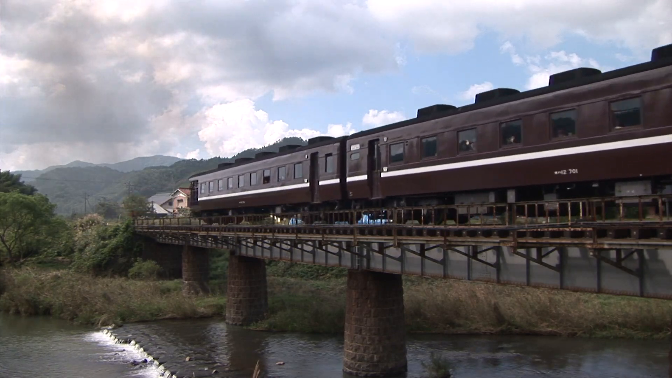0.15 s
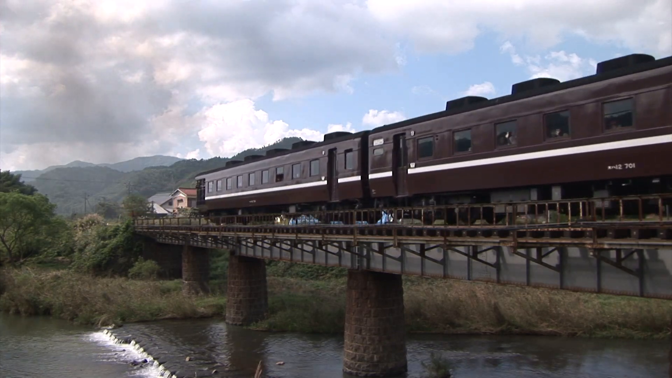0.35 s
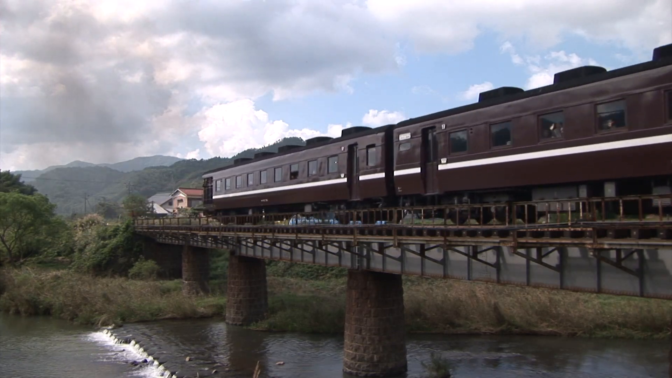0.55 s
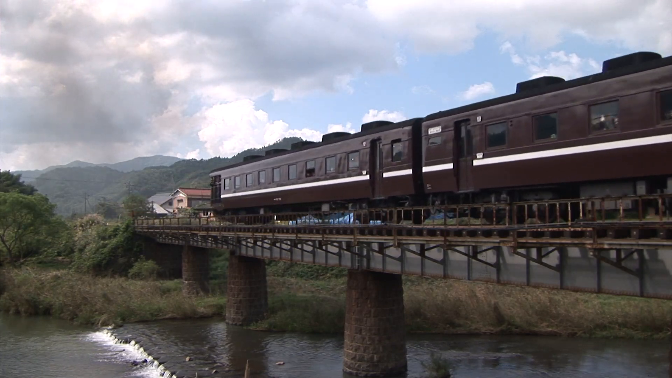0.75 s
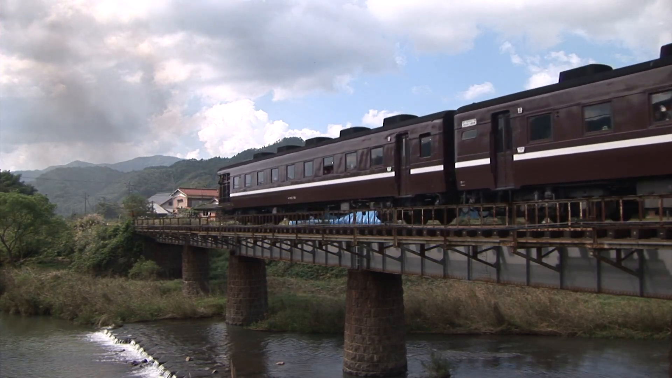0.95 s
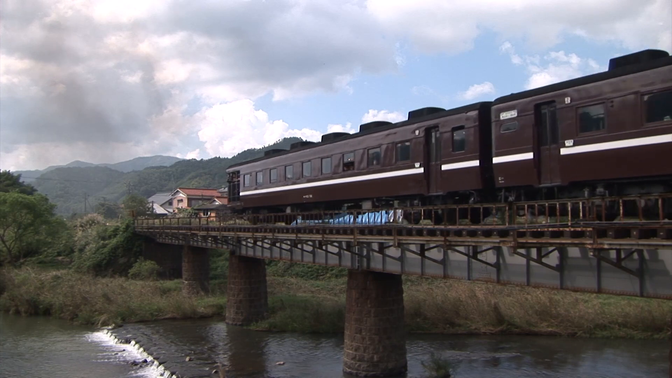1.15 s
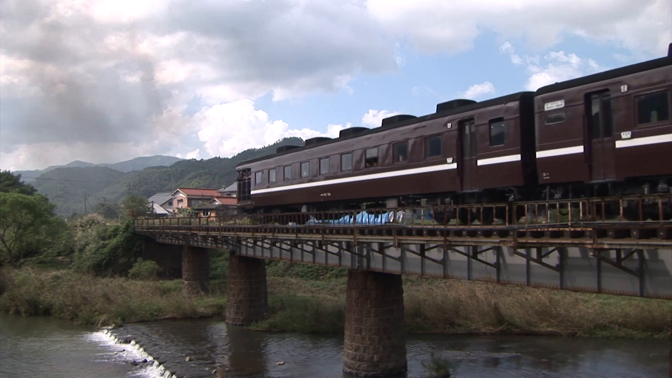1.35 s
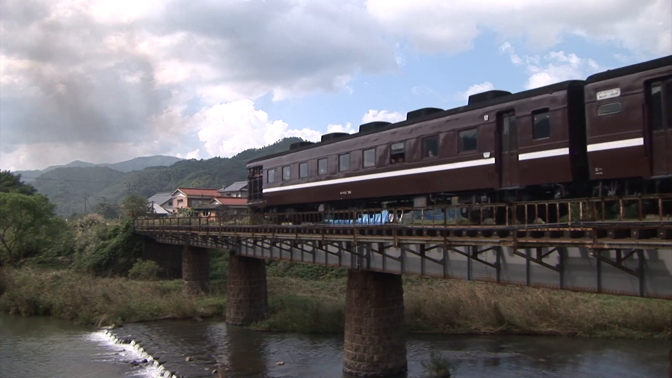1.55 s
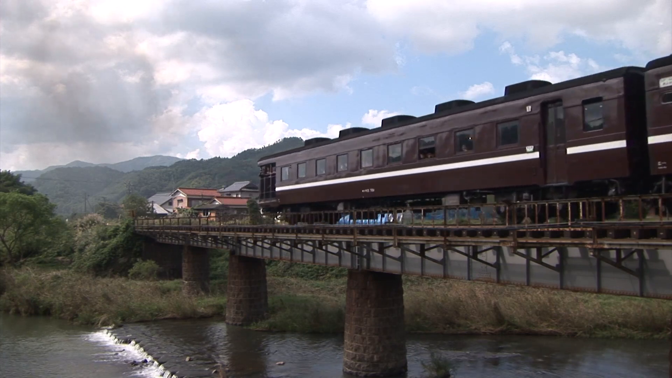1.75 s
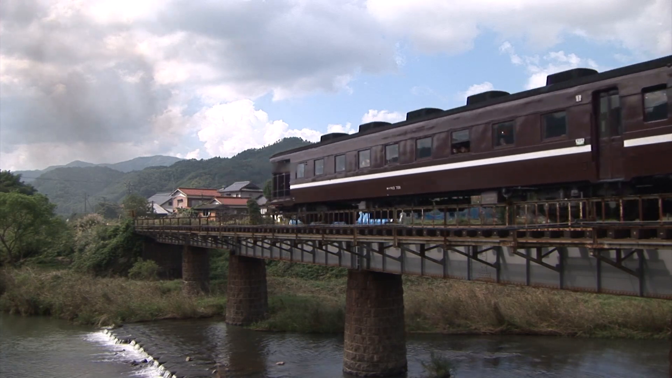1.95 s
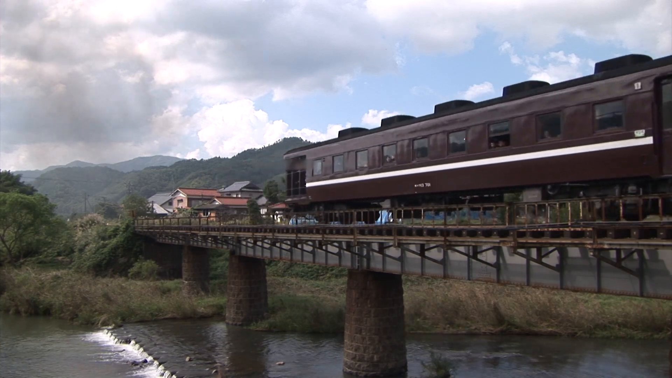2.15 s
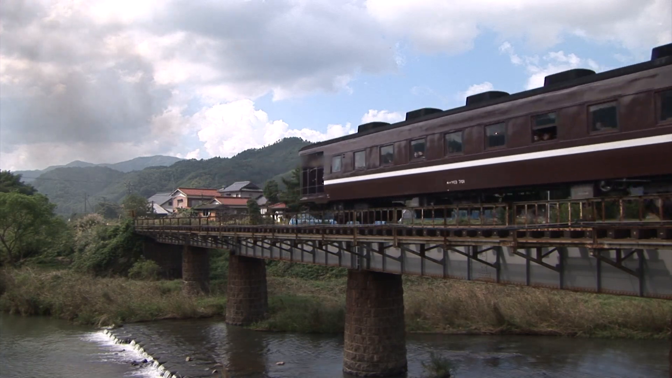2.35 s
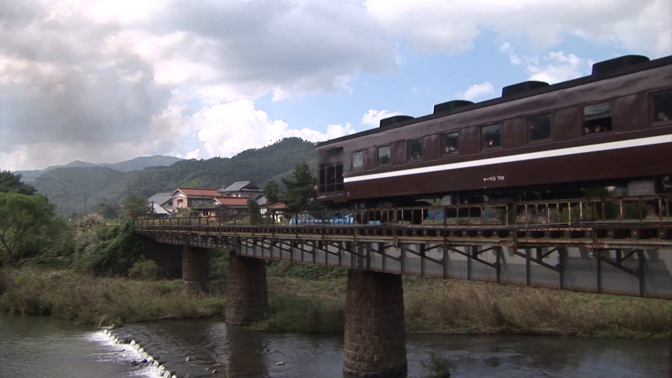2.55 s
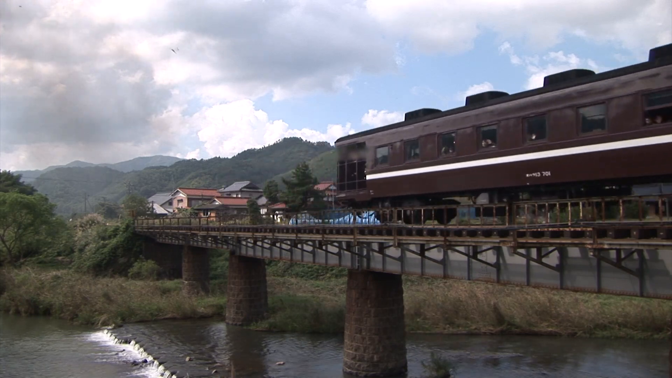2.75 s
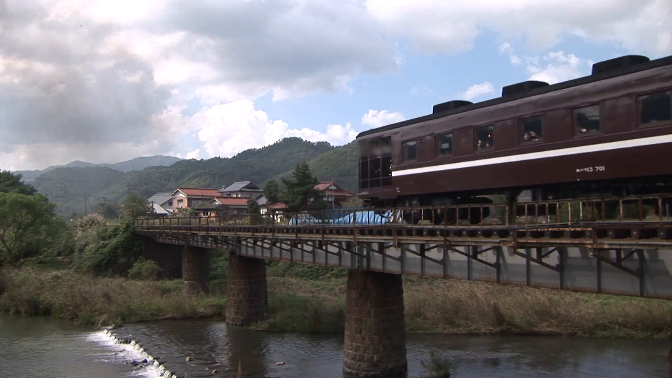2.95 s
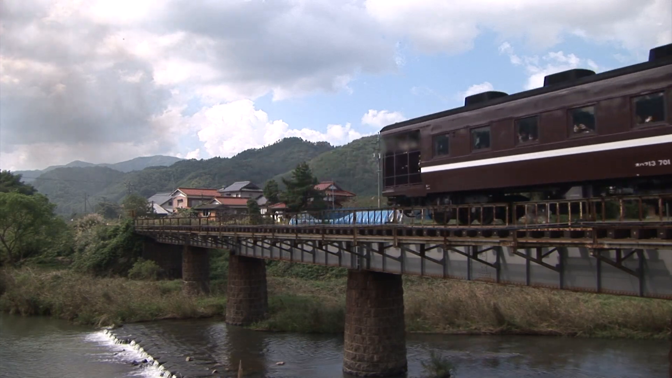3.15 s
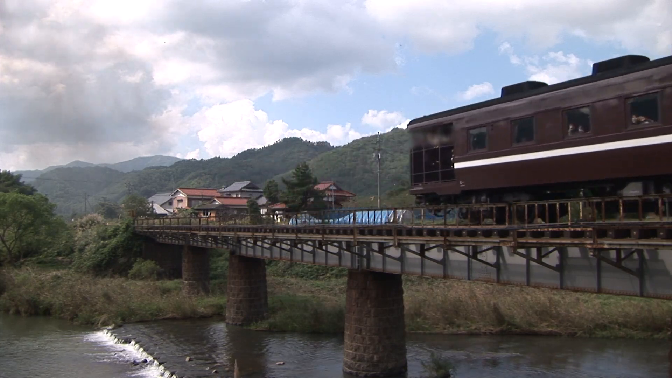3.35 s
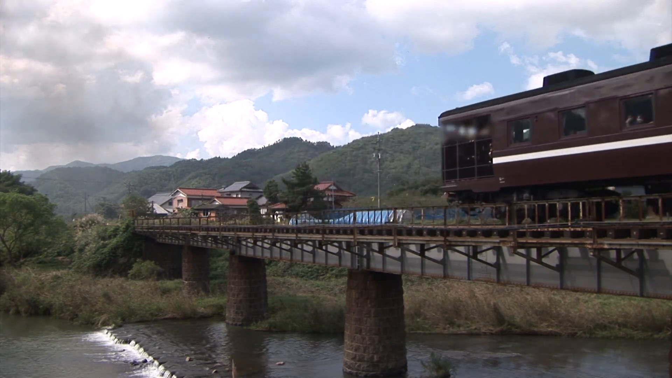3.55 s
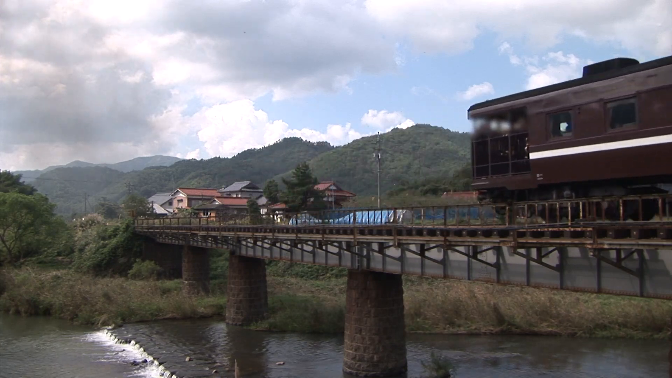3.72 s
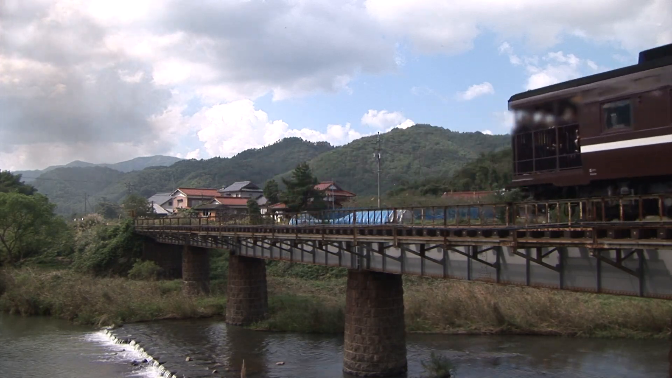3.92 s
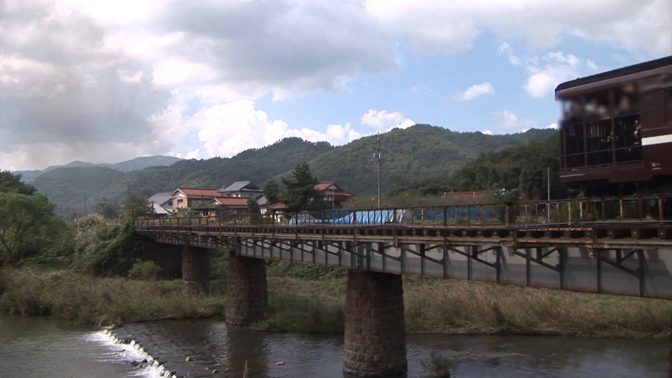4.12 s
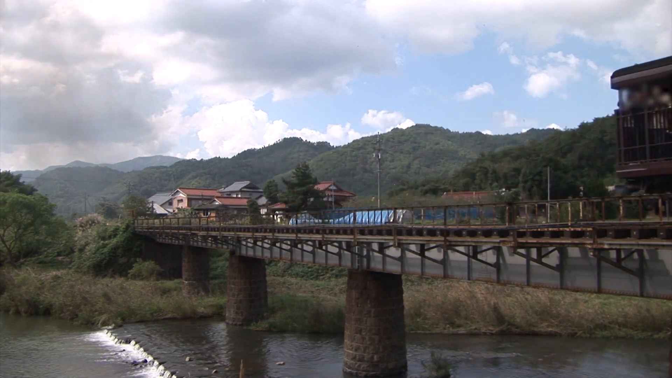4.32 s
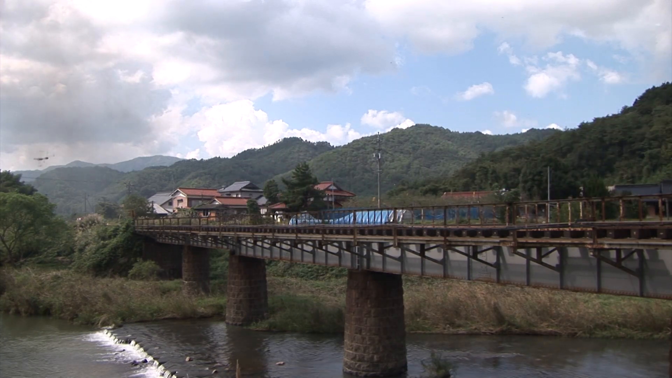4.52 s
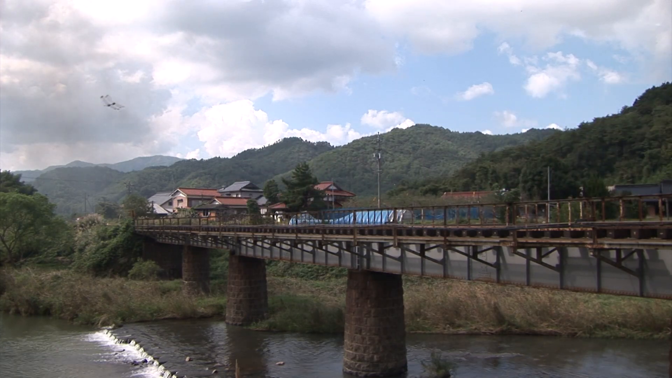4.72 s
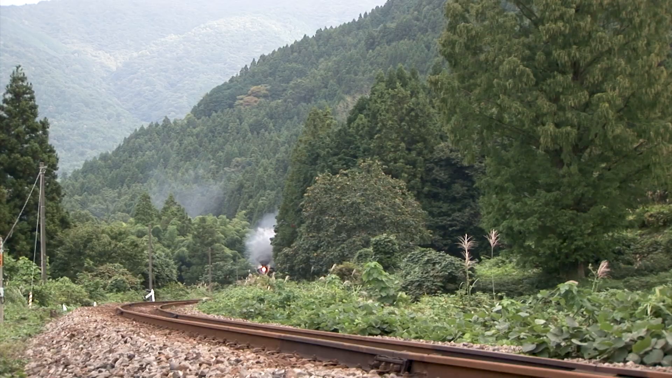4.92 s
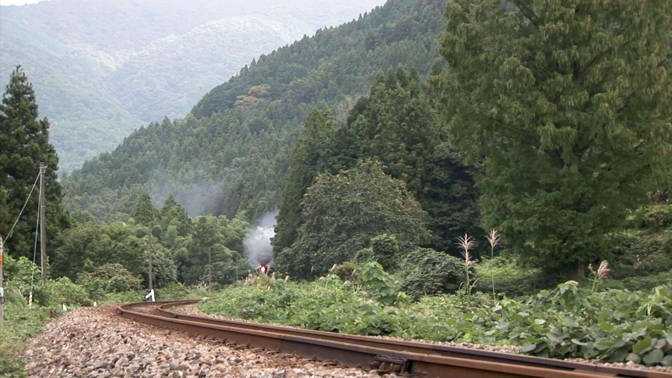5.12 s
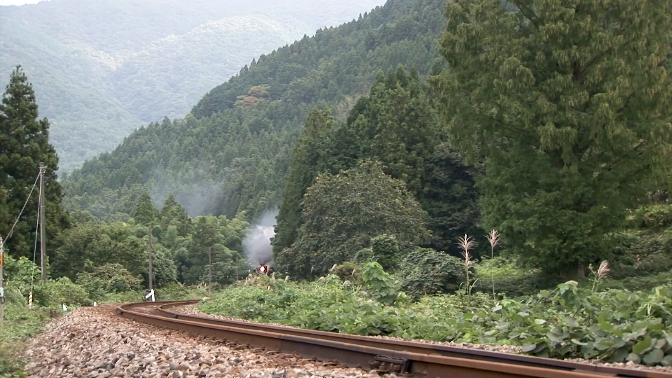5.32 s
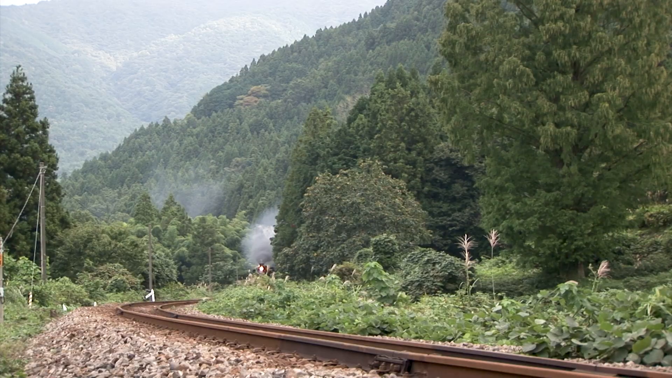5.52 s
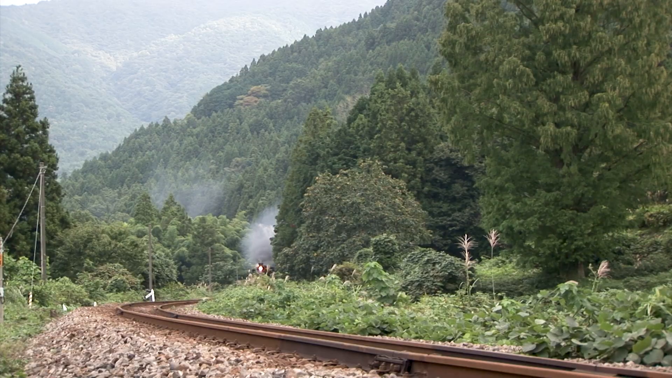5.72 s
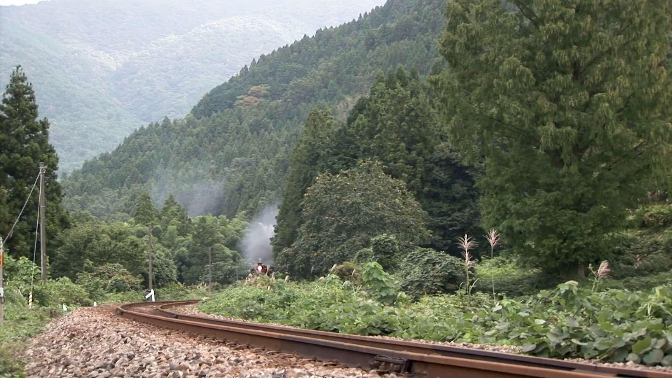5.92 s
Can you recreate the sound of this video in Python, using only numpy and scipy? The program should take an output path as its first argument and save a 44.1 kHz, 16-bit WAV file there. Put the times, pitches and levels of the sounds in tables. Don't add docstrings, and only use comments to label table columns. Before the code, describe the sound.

Passenger coaches clatter over rail joints on a steel girder bridge, booming and rumbling with faint squeals, then a near-silent valley with crickets.

```python
import sys
import numpy as np
from scipy import signal
from scipy.io import wavfile

SR = 44100
rng = np.random.default_rng(int(sys.argv[2]) if len(sys.argv) > 2 else 0)


def dump(signal):
    limited = np.clip(np.atleast_2d(signal).T, -1, 1)
    pcm = np.round(limited * 32767).astype(np.int16)
    wavfile.write(sys.argv[1], SR, pcm)


def ratio(d):
    e = np.asarray(d, float) / 20
    return 10 ** e


N = 263277
T = np.arange(N) / SR

# (time [s], rumble level [dB])
ROLLING_LEVEL = [
    (0, -27),
    (.6, -32.5),
    (1.3, -32.5),
    (1.8, -30.5),
    (2.6, -32.5),
    (3.6, -33.5),
    (4.2, -33.5),
    (4.9, -36.5),
]
# (frequency [Hz], left-right likeness [0..1])
BRIDGE_LIKENESS = [(60, 0.95), (120, 1), (240, 0.92), (470, 0.83), (930, 0.9), (1840, 0.93), (3640, 0.75),
                   (7210, 0.91), (14300, 1)]
# (frequency [Hz], left minus right [dB])
BRIDGE_TILT = [(60, -1), (120, 0), (240, 0.0), (470, -2.5), (930, -4), (1840, -4.5), (3640, -3),
               (7210, -0.5), (14300, 5)]
# (time [s], blow [dB], brightness [dB], rebound [dB rel], rebound delay factor [1])
NEAR_AXLES = [
    (.1805, -7.5, -4, -3, 0.73),
    (.440, -5.5, -2, -11, 1.2),
    (2.0123, -8, -1, 3, 0.64),
    (2.266, -6, -0.5, 0.5, 0.94),
    (2.8995, -8, -4.5, -1, 0.96),
    (3.15, -5.5, -4, 1, 1.15),
    (4.682, -7.5, -3.5, -13, 0.99),
]
FAR_AXLES = [
    (-.008, -10.5, 1.5, 1.5, .6),
    (1.559, -10.5, 0.5, 6, 0.94),
    (1.8155, -10.5, 0.5, 2, 1.1),
]
CRACK_DB, CRACK_TOP_DB, CRACK_PAN_DB = -15, -23, -10.5


def rms_one(x):
    return x / np.sqrt(np.mean(x ** 2) + 1e-20)


def columns_at(rows, where, scale=lambda v: v):
    key, *columns = np.transpose(rows)
    return [np.interp(scale(where), scale(key), c) for c in columns]


def at_hz(rows, hz):
    return columns_at(rows, hz, np.log)


def drift(rate):
    r = np.exp(-80 * np.pi * rate / SR)
    slow = signal.lfilter([1], [1, -2 * r, r * r], rng.standard_normal(N // 40 + 2002))[2000:]
    return np.interp(np.arange(N) / 40, np.arange(len(slow)), rms_one(slow))


def resonance(x, hz, width_hz):
    r = np.exp(-np.pi * width_hz / SR)
    poles = [1, -2 * r * np.cos(2 * np.pi * hz / SR), r * r]
    return signal.lfilter(np.array([1, 0, -1]) * (1 - r * r) / 2, poles, x)


def narrow_noise(shape, hz, width_hz, widen=1):
    once = resonance(rng.standard_normal(shape), hz, width_hz)
    return rms_one(resonance(once, hz, widen * width_hz))


def band_pass(x, low, high):
    return signal.sosfilt(signal.butter(3, [low, high], "band", fs=SR, output="sos"), x)


def sides(pan_db):
    return ratio(np.multiply.outer([.5, -.5], pan_db))


def fade(seconds_in, length, power):
    return np.clip(seconds_in / length, 0, 1) ** power


def banded(spectrum, likeness, envelope, start=0):
    band_edges = 28 * 2 ** (np.arange(28) / 3)
    run_in = 4000
    out, power = np.zeros((2, N)), 0
    white = rng.standard_normal((2, 2, N - start + run_in))
    for k, (low, high) in enumerate(zip(band_edges, band_edges[1:])):
        mid, side = band_pass(white[k % 2], low, high)[:, run_in:]
        hz = np.sqrt(low * high)
        alike = np.clip(at_hz(likeness, hz)[0], 0, 1)
        gain = ratio(at_hz(spectrum, hz)[0])
        pair = np.sqrt(1 + alike) * mid + np.sqrt(1 - alike) * side * [[1], [-1]]
        out[:, start:] += gain * pair * envelope(hz)[..., start:]
        power += gain ** 2 * 4 * (high - low) / SR
    return out / np.sqrt(power)


def valley():
    # (frequency [Hz], density [dB per Hz])
    murmur = [(18, -42), (30, -11), (188, 2), (419, 0), (516, 0), (780, -8), (1310, -9), (2840, -22.5),
              (5720, -24.5), (6340, -25), (9100, -26), (12100, -25), (14500, -33.5)]
    # (frequency [Hz], left-right likeness [0..1])
    valley_likeness = [(60, 0.98), (240, 0.98), (930, 0.72), (3640, 0.61), (14300, 0.56)]
    # (frequency [Hz], width [Hz], level [dB])
    crickets = [(4080, 220, -86.5), (4420, 160, -88), (6330, 190, -82)]
    # (start [s], length [s], level [dB])
    katydid = [
        (5.167, 0.14, -75),
        (5.355, .335, -77),
        (5.71, .066, -81.5),
        (5.795, .06, -80),
        (5.9, .08, -74),
    ]
    swell_db, edge_s = 7, .012
    out = ratio(-61.5) * banded(murmur, valley_likeness, lambda hz: ratio(drift(5.7)), start=round(4.9 * SR))
    for hz, width_hz, level_db in crickets:
        out += ratio(level_db) * narrow_noise((2, N), hz, width_hz)
    bursts = np.zeros(N)
    for s, length, level_db in katydid:
        swell = ratio(level_db + swell_db * ((T - s) / length - 1).clip(-1, 0))
        bursts += swell * (np.minimum(T - s, s + length - T) / edge_s).clip(0, 1)
    pulses = 1 + 0.76 * np.sin(2 * np.pi * 42 * T + 1.5 * drift(4.5))
    return out + narrow_noise((2, N), 11600, 2200) * pulses * bursts


def rolling(patchy_db=1.43):
    # (frequency [Hz], density [dB per Hz])
    rumble = [(24, -51.5), (40, -19), (86, -9.5), (167, -2), (350, -3.5), (427, 2), (734, -7), (1090, -7.5),
              (1870, -17.5), (2170, -16), (2340, -23), (2520, -20.5), (4550, -34), (8860, -45),
              (14500, -60)]
    level_db, = columns_at(ROLLING_LEVEL, T)
    deep_db = -10 + 4.5 * drift(0.98)
    hiss_db = -0.5 + 0.1 * (level_db - level_db.mean())
    shared = drift(5.4)

    def envelope(hz):
        deep = np.clip(np.log2(200 / hz), 0, 1.5)
        bright = np.clip(np.log2(hz / 1200), 0, 2.5)
        patches_db = patchy_db * (0.42 * shared + drift(9))
        lean = sides(at_hz(BRIDGE_TILT, hz)[0] + 1.3)[:, None]
        return lean * ratio(level_db + deep * deep_db + bright * hiss_db + patches_db)
    return banded(rumble, BRIDGE_LIKENESS, envelope)


def wheels():
    # (frequency [Hz], width [Hz], level [dB])
    wheel_modes = [(2130, 71, 0.5), (2530, 84, -4.5), (2780, 42, -3.5), (3210, 63, -3.5), (3380, 87, -9.5),
                   (3900, 54, -8), (4280, 27, -11.5)]
    level_db, = columns_at(ROLLING_LEVEL, T)
    out = np.zeros(N)
    for hz, width_hz, mode_db in wheel_modes:
        out += ratio(mode_db + 2.5 * drift(6)) * narrow_noise(N, hz, width_hz)
    return out * ratio(level_db - 29.5) * sides(-7.5)[:, None]


def squeals():
    # (start [s], end [s], frequency [Hz], width [Hz], level [dB])
    whistles = [
        (0, .5, 8570, 300, -78),
        (.55, .95, 8900, 200, -77.5),
        (1.503, 1.59, 6500, 200, -66),
        (1.616, 2.297, 8800, 399, -69.5),
        (2.305, 2.587, 8800, 255, -64),
        (2.66, 2.82, 8950, 300, -70),
        (2.95, 3.751, 8950, 326, -72),
        (4.1, 4.62, 3440, 60, -60),
        (4.577, 4.696, 3480, 60, -52.5),
        (1.427, 1.454, 2130, 80, -46),
    ]
    out = np.zeros(N)
    for start, end, hz, width_hz, level_db in whistles:
        span = (T >= start) & (T < end)
        tone = narrow_noise(span.sum(), hz, width_hz)
        window = np.clip(np.minimum(T[span] - start, end - T[span]) / 0.02, 0, 1)
        out[span] += tone * window * ratio(level_db + 1.2 * drift(10)[span])
    return out


def cracks(axles, rel_db, top_db, pan_db, lead_s=0):
    return [(s - lead_s, blow_db + rel_db, top_db + bright_db, pan_db) for s, blow_db, bright_db, *_ in axles]


def ticks(snap_db=-7, snap_t60=0.11, tick_db=-9, tick_t60=.07):
    snap = rms_one(band_pass(rng.standard_normal(N), 500, 1620))
    tick = rms_one(band_pass(rng.standard_normal(N), 6500, 10000))
    tick = tick + .3 * np.multiply.outer([1, -1], np.roll(tick, SR))
    near = cracks(NEAR_AXLES, CRACK_DB, CRACK_TOP_DB, CRACK_PAN_DB)
    far = cracks(FAR_AXLES, -18, -15, -1, lead_s=.006)
    out = np.zeros((2, N))
    for s, crack_db, top_db, pan_db in near + far:
        age = np.maximum(T - s, 0)
        out += (T >= s) * snap * ratio(crack_db + snap_db - 60 * age / snap_t60) * sides(pan_db)[:, None]
        out += (T >= s) * tick * ratio(crack_db + top_db + tick_db - 60 * age / tick_t60)
    return out


def rail(ring_db=-10.5, contact_s=0.011):
    # (frequency [Hz], level [dB], t60 [s])
    rings = [(1450, -5, .08), (1600, -5, .08), (2110, -7, .1), (2170, -8, .12), (2475, -1, .08),
             (2510, -5, .2), (2745, -1, .2), (2950, -9, .1), (3190, -8, .12), (3450, -5, .2),
             (3600, 0, .04), (3740, 0, .04), (3960, -13, .07), (4830, -13, .06), (5670, -20, .1),
             (6640, -13, .07)]
    contacts = cracks(NEAR_AXLES, CRACK_DB, CRACK_TOP_DB, CRACK_PAN_DB)
    strength_db = rng.normal(0, 2, (len(contacts), len(rings)))
    out = np.zeros((2, N))
    for k, (hz, level_db, t60) in enumerate(rings):
        force = np.zeros((2, N)) + 1e-18
        for (s, crack_db, _, pan_db), own_db in zip(contacts, strength_db[:, k]):
            i = round(s * SR)
            burst = rng.standard_normal(1200) * np.exp(-T[:1200] / contact_s)
            burst[:8] += rng.choice([-1, 1]) * 5 * np.hanning(8)
            burst /= np.linalg.norm(burst)
            force[:, i:i + 1200] += ratio(crack_db + level_db + own_db) * sides(pan_db)[:, None] * burst
        r, w = ratio(-60 / (t60 * SR)), 2 * np.pi * hz / SR
        out += signal.lfilter([0, np.sin(w)], [1, -2 * r * np.cos(w), r * r], force)
    return ratio(ring_db) * out


def blow_envelope(hz, step=32):
    # (frequency [Hz], first t60 [s], late t60 [s], late share [dB])
    release = [(50, 0.33, 5.2, -5), (200, 0.69, 1.83, -11.5), (600, 0.19, 1.3, -12),
               (2020, 0.36, 2.8, -6.5), (5000, 0.81, 2.2, -3), (12000, 0.46, 1.4, -6.5)]
    near_colour = [-.5, -5, -3.5, -3]
    far_colour = [-0.5, -6, -1, -11.5]
    bright_share = [0, 0.92, 0.6]
    # (delay [s], level [dB rel], centre [Hz])
    near_rebound = [(.012, -6.5, 1297), (.036, -2, 480), (.088, -6.5, 425), (.18, -12.5, 320)]
    far_rebound = [(.006, -4, 900), (.024, 2, 1100), (0.041, 0, 600), (.085, -10, 400)]
    # (axles, colour, swell [s], smear [s], bass lead [s], rebounds); bass from afar trails
    joints = [(NEAR_AXLES, near_colour, 0.019, 0, 0.011, near_rebound),
              (FAR_AXLES, far_colour, 0.0081, .045, -0.0028, far_rebound)]
    first, late, late_db = at_hz(release, hz)
    share = np.interp(np.log(hz), np.log([700, 3000, 9000]), bright_share)
    t, power = T[::step], 0
    for axles, (low_db, *high_db), swell, smear, lead, rebounds in joints:
        colour_db = np.interp(np.log(hz), np.log([250, 700, 3000, 5500, 9000]), [low_db, 0, *high_db])
        rise = max(swell * np.clip(500 / hz, .06, 2.5), smear)
        early = lead * np.clip(400 / hz, 0, 1.5) ** 2
        for s, blow_db, bright_db, rebound_db, lag in axles:
            age = np.maximum(t - s + early, 0)
            decay = ratio(-60 * age / first) + ratio(late_db - 60 * age / late)
            shape = (1 - np.exp(-age / rise)) * decay
            power = power + (ratio(blow_db + colour_db + share * bright_db) * shape) ** 2
            for delay, thud_db, centre_hz in rebounds:
                age = np.maximum(t - s - lag * delay + .004, 0)
                dull_db = -5.5 * np.log2(hz / centre_hz) ** 2
                thud = ratio(blow_db + rebound_db + thud_db + dull_db - 60 * age / .2)
                power = power + (thud * (1 - np.exp(-age / 0.0099))) ** 2
    return np.interp(T, t, np.sqrt(power))


def girders(plates_db=-19.5, broad_db=-9, lumpy_db=0.7, own_db=-0.04):
    # (frequency [Hz], density [dB per Hz])
    bloom = [(24, -49.5), (40, -24), (86, -19.5), (155, -5), (204, -8.5), (288, 0.5), (325, -9),
             (427, -2.5), (1660, -17), (1780, -19), (3470, -25.5), (5150, -39), (9080, -44), (11100, -50),
             (14500, -72)]
    # (frequency [Hz], width [Hz], level [dB])
    plates = [(194, 18, -4.5), (268.2, 25, -2), (293.6, 2.6, 1.5), (360, 39, -2.5), (418.5, 26, 2.5),
              (487, 20, -1), (547.7, 54, 4), (628.2, 11, -2), (664, 15, -6.5), (792, 61, -4),
              (941, 31, -6.5), (2130, 29, -12.5), (2498, 58, -9.5), (2740, 44, -16.5), (3136, 40, -17.5),
              (3483, 65, -18.5), (3980, 27, -23)]
    lumps = drift(34)

    def shaking(hz):
        lean = sides(at_hz(BRIDGE_TILT, hz)[0])[:, None]
        lumpy = ratio(lumpy_db * min(1, 500 / hz) * lumps + own_db * drift(6.8))
        return blow_envelope(hz) * lean * lumpy
    out = ratio(broad_db) * banded(bloom, BRIDGE_LIKENESS, shaking)
    for hz, width_hz, level_db in plates:
        out += ratio(plates_db + level_db) * narrow_noise(N, hz, width_hz, widen=3) * shaking(hz)
    return out


def scene():
    bridge = rolling() + wheels() + squeals() + ticks() + rail() + girders()
    bridge = bridge * fade(4.9005 - T, 0.33, 2.17)
    return bridge + valley() * sides(1.7)[:, None] * fade(T - 4.963, 0.27, 1.85)


def roll_off(x):
    return signal.sosfilt(signal.butter(12, 14890, fs=SR, output="sos"), x)


def record(dry):
    dry = signal.sosfilt(signal.cheby2(12, 40, 14500, fs=SR, output="sos"), dry)
    mix = signal.sosfilt(signal.butter(6, 47, "high", fs=SR, output="sos"), dry)
    return roll_off(mix)


dry = scene()
out = record(dry)
dump(out)
```